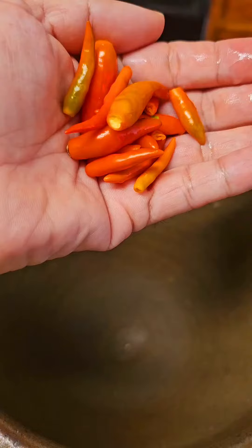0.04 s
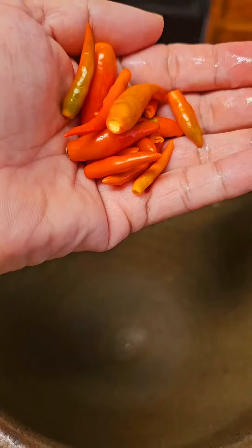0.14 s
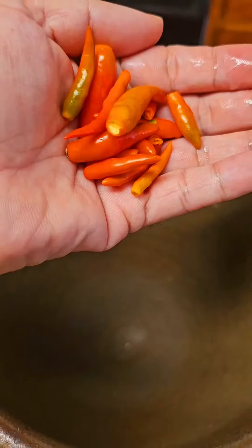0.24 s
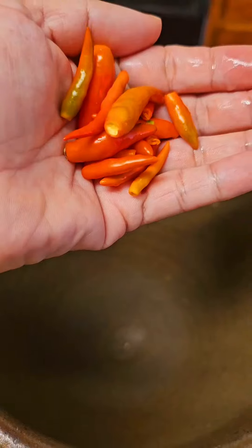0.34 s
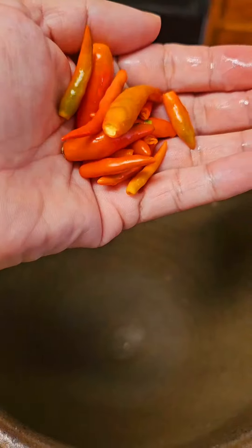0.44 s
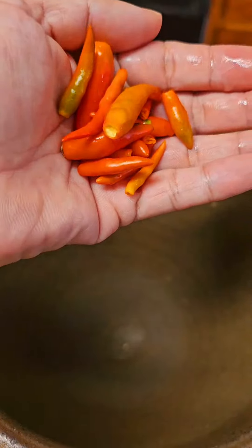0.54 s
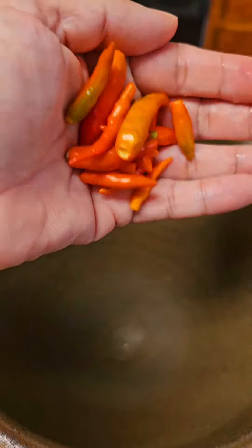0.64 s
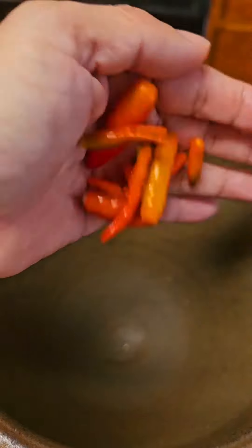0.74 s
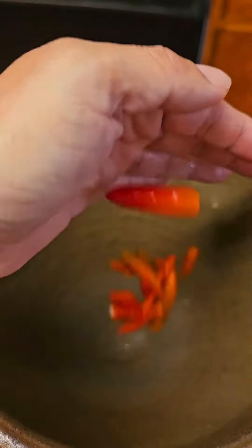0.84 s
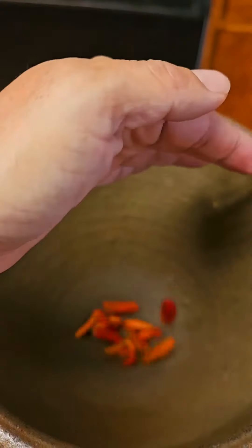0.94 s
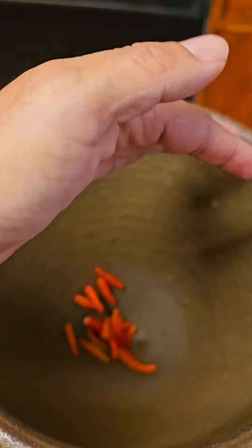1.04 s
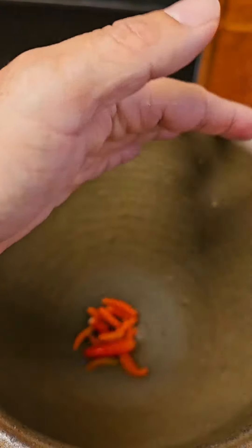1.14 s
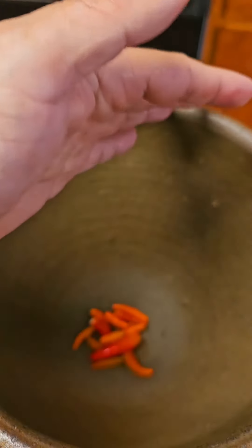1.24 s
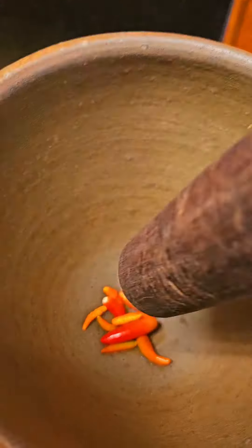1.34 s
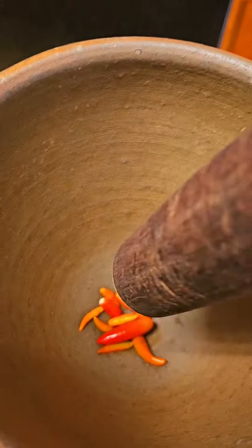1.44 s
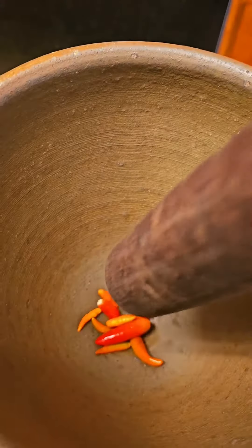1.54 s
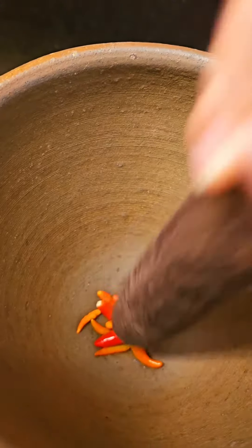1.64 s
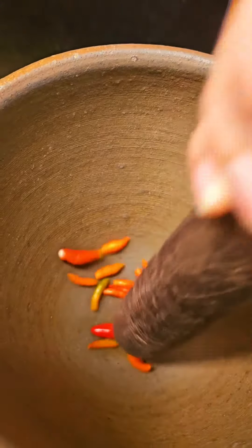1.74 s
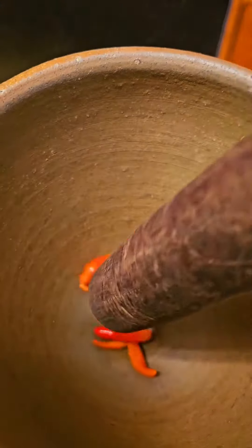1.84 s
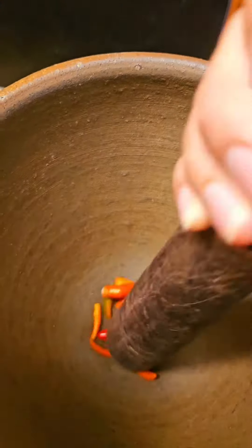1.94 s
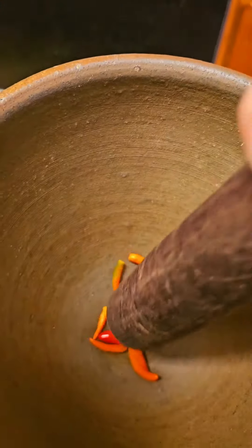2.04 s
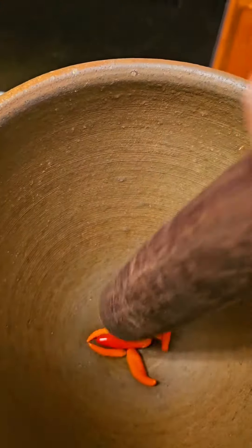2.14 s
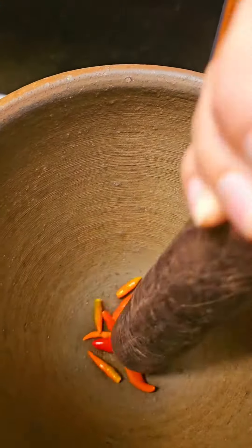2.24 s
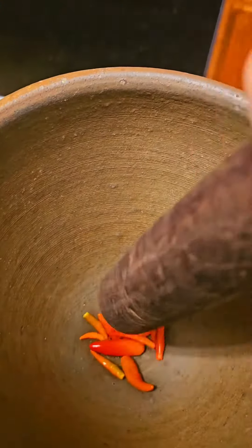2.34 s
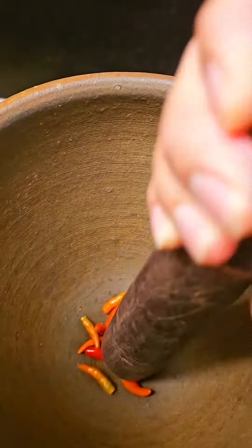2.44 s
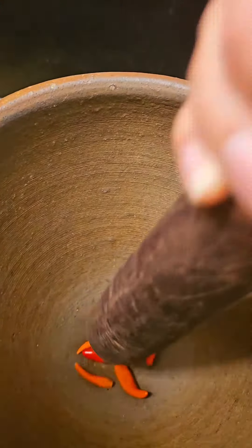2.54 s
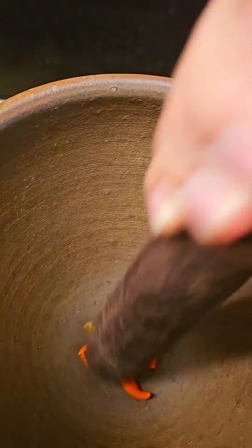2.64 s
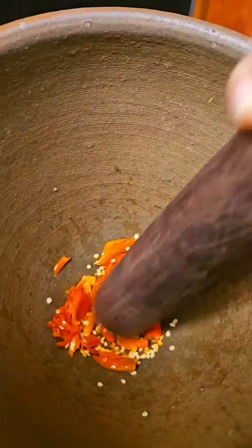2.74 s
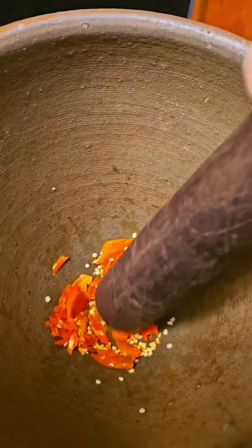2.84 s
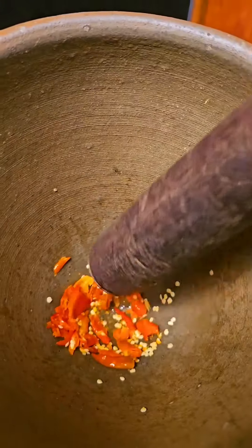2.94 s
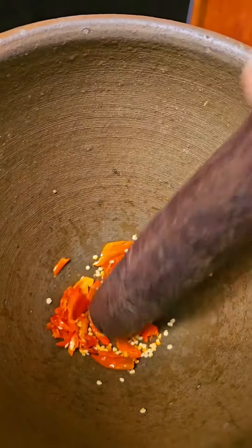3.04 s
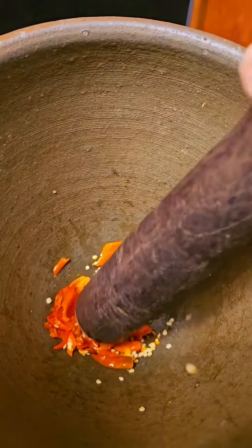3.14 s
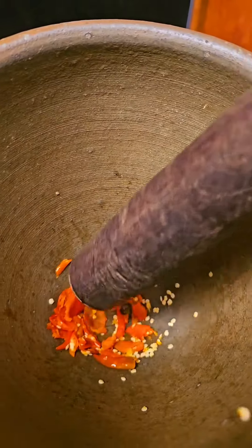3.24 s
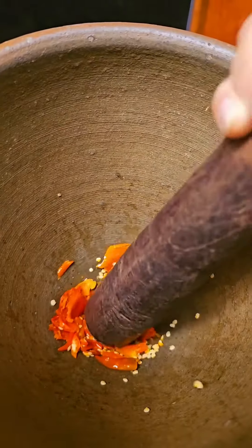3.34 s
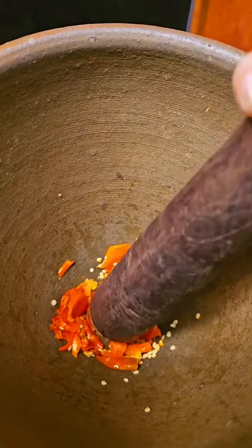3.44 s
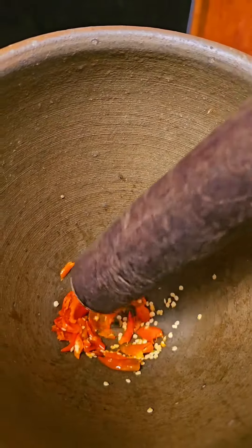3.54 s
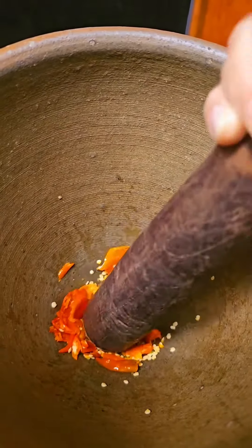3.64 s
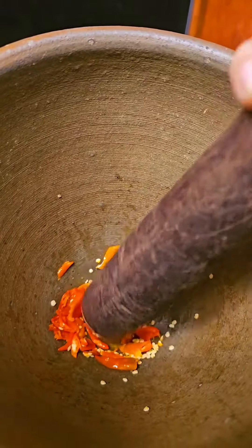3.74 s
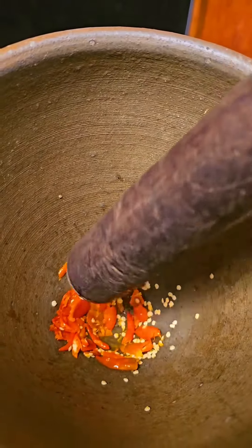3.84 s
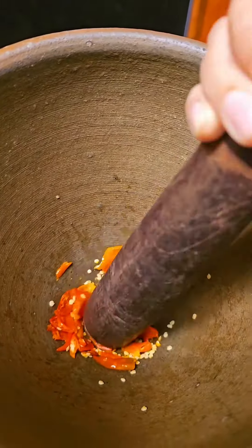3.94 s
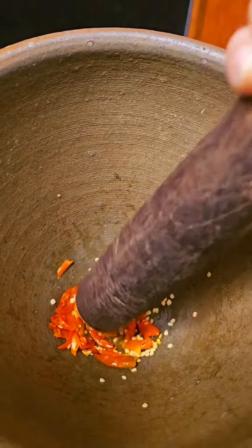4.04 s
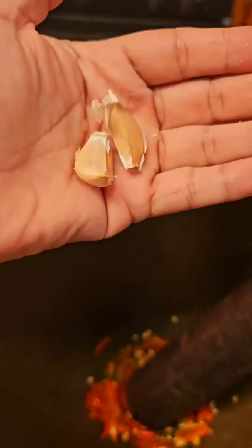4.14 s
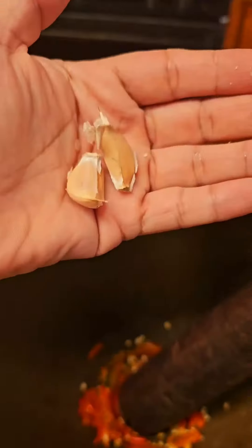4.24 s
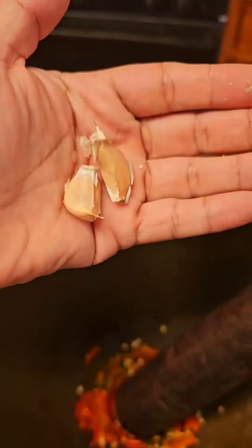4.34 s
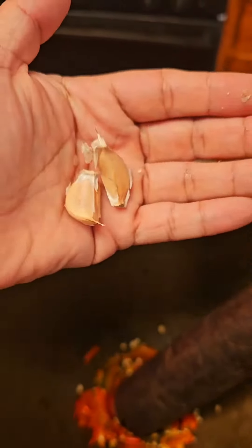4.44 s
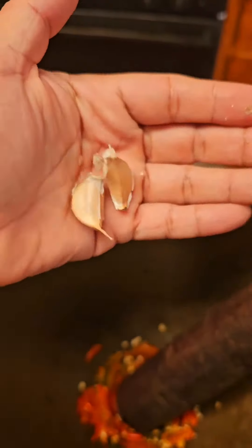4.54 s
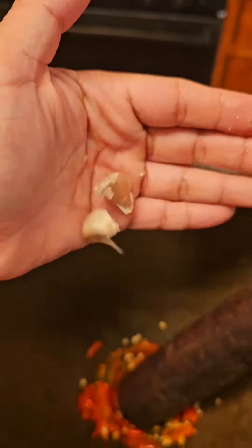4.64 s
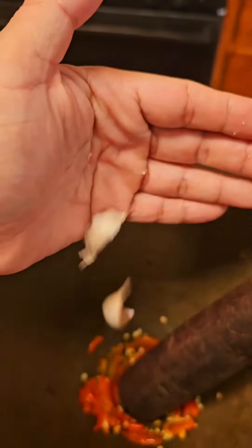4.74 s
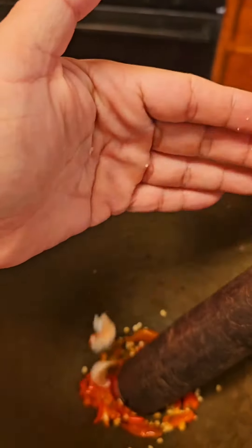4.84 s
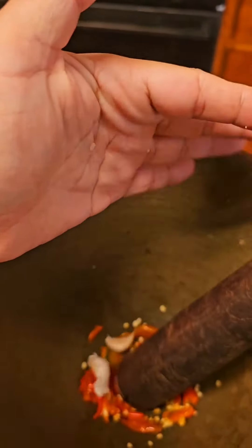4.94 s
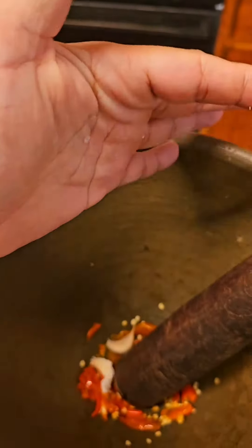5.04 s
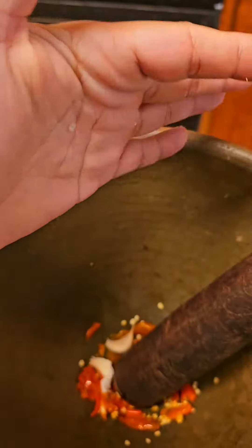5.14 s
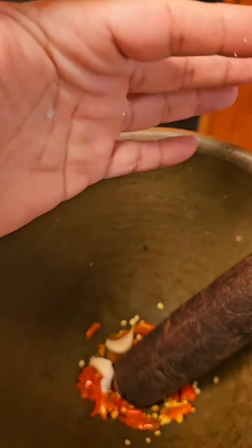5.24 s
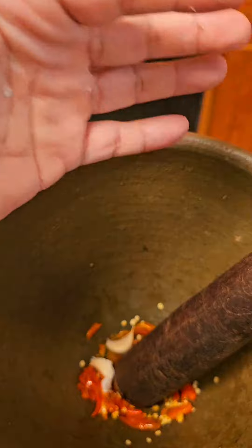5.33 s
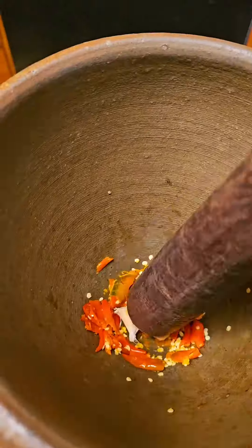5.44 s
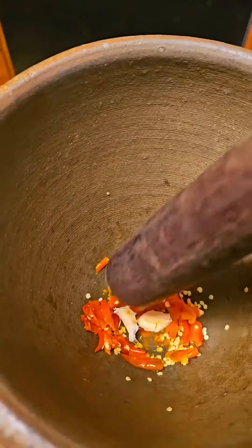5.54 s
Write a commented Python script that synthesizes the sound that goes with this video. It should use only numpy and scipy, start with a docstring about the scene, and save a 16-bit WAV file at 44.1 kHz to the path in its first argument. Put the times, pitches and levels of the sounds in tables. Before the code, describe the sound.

Close kitchen pounding: a soft spill of pods, nine steady hollow pestle blows growing squelchier, a pause, then light garlic ticks on clay.

```python
"""A wooden pestle pounds chillies nine times in a clay mortar, close by in a small kitchen; two garlic cloves follow.
Before the blows the pods patter down. The first blow knocks almost bare clay; pods cushion the next, then thin out.
Bell-shaped pushes ring the mortar's resonances; filtered, grainy noise makes the squelches, slaps and rustles.
Fading noise makes the echo. Behind it all lie a low hum, a thin whine at first and a faint hiss later on."""
import sys
import numpy as np
from scipy import signal
from scipy.fft import rfft, irfft
from scipy.io import wavfile

SR = 44100
rng = np.random.default_rng(int(sys.argv[2]) if len(sys.argv) > 2 else 0)


def to_wav(sig):
    """Store sig (one row per channel, or 1-D mono) as 16-bit WAV at the path in sys.argv[1].

    Samples outside -1..1 are clipped; the rate is SR.
    """
    pcm = np.clip(np.atleast_2d(sig), -1, 1) * 32767
    pcm = np.round(pcm).astype(np.int16)
    wavfile.write(sys.argv[1], SR, pcm.T)  # frames by channels


N = 246078

# pestle blows: (time [s], thud level [dB], contact half-time [ms], clay clink level [dB], squelch level [dB],
# squelch length [s], air pocket [Hz], squelch left-right difference [dB])
PESTLE_BLOWS = [(1.778, -1.5, 0.16, -16.5, -30, 0.0069, 1130, 9),
                (2.035, -16, 1.24, -39.5, -23.5, 0.0041, 8560, 8),
                (2.2975, -6, 0.92, -28.5, -18, 0.0037, 3300, 8),
                (2.5314, -8.5, 1.5, -35.5, -20.5, .004, 3260, 15.5),
                (2.837, -9, 0.61, -45.5, -21.5, 0.0018, 6600, 19.5),
                (3.1446, -5, 0.54, -41.5, -9.5, 0.0014, 7430, 6.5),
                (3.4355, -4.5, 0.53, -27.5, -11, .0018, 4300, 0.5),
                (3.7345, -6, 0.61, -33.5, -8, 0.00093, 5690, -4),
                (4.027, -9, 0.51, -41, -15, .0012, 5200, 6.5)]
# the pestle slips off the pulp and squeezes it again:
# (time [s], squelch level [dB], squelch length [s], air pocket [Hz], left-right difference [dB])
PESTLE_SLIPS = [(2.308, -22, 0.0036, 6560, -11.5), (2.5442, -14.5, 0.0022, 7400, 3.5),
                (2.847, -19, 0.0026, 4650, 1), (3.442, -26.5, 0.0071, 2270, -1),
                (4.044, -25.5, 0.0014, 7990, 14)]
# resonances of the mortar on its board, with the hollow of the bowl:
# (frequency [Hz], level [dB], time to fall by 60 dB [s])
MORTAR_MODES = [(65, -26, 0.24), (94, -7.5, 0.036), (161.5, -20, 0.26), (199, -3, 0.03),
                (276.4, -11, 0.084), (347, 1, 0.032), (447, -12.5, 0.21), (492.7, 7.5, 0.039),
                (747, 1, 0.034), (914, -2, 0.016), (1112, -1.5, 0.024), (1420, -3, .035)]
# resonances of the clay wall, for hard contact: (frequency [Hz], level [dB], time to fall by 60 dB [s])
WALL_MODES = [(1230, -5, .04), (1287, 0, .09), (1840, -18, .05), (2240, -19, .09), (2830, -15, .06),
              (3160, -5, .07)]
# the pounding and its echo are silent between these times [s]
SILENT_FROM_S, SILENT_UNTIL_S = 4.147, 5.356


def pestle():
    """Each blow thuds, clinks on the clay and gurgles, more so on a thick cushion; slips bump softly."""
    # colour of the gurgle: (frequency [Hz], level [dB])
    gurgle_colour = [(60, -21), (150, -10.5), (350, 0), (750, -1.5), (1400, -9.5), (3000, -12.5),
                     (16000, -30)]
    gurgle_db = -27  # relative to the thud, at a contact half-time of 1 ms
    gurgle_rise_s, gurgle_decay_s = .005, .012
    slip_thud_db = -11.5  # relative to the slip's squelch
    out = np.zeros((2, N))
    for s, thud_db, contact_ms, clink_db, *_ in PESTLE_BLOWS:
        lead, thud = knock(MORTAR_MODES, contact_ms)
        # the mortar stands a little to the left
        add(out, s - lead, amp(thud_db) * ports(thud, side_db=1.14, lag_ms=.38))
        lead, clink = knock(WALL_MODES, contact_ms=.17)
        # minus: fills in the clink's sound just below the wall's lowest resonance
        add(out, s - lead, -amp(clink_db) * ports(clink, side_db=6.5, lag_ms=.14))
        lead, gurgle = burst(lambda hz: read(gurgle_colour, hz), gurgle_rise_s, gurgle_decay_s,
                             grain_db=6.5, same=.13)
        add(out, s + gurgle_rise_s - lead, amp(thud_db + gurgle_db) * contact_ms * gurgle)
    lead, bump = knock(MORTAR_MODES, contact_ms=1.2)
    for s, squelch_db, *_ in PESTLE_SLIPS:
        add(out, s - lead, amp(squelch_db + slip_thud_db) * bump)
    return out


def pulp(spread_db=0.5):
    """Pulp squirts just before each blow and at each slip; skins snap. Returns jets and spray."""
    # a taut skin snaps: (time [s], level [dB], air pocket [Hz], left-right difference [dB])
    skin_snaps = [(1.7766, -18.5, 2560, 10), (2.0327, -7, 8230, 0), (2.528, -10.5, 3270, -8.5),
                  (5.477, -32, 9000, -5)]
    squelch_lead = .6  # juice peaks this share of its length before the pestle lands
    pocket_db, snap_pocket_db = 8.5, 13  # height of the air pocket's resonance
    snap_s = .0005
    squirts = []
    for s, _, _, _, db, length, hz, side_db in PESTLE_BLOWS:
        squirts.append(squirt(s - squelch_lead * length, db, length, hz, side_db, pocket_db))
    for slip in PESTLE_SLIPS:
        squirts.append(squirt(*slip, pocket_db))
    for s, db, hz, side_db in skin_snaps:
        squirts.append(squirt(s, db, snap_s, hz, side_db, snap_pocket_db))
    jets, sprays = np.zeros((2, 2, N))
    for start, jet, spray in squirts:
        add(jets, start, jet)
        add(sprays, start, amp(spread_db) * spray)
    return jets, sprays


def squirt(s, db, length, pocket_hz, side_db, pocket_db):
    """Juice and air escape through a pocket: returns start time, aimed jet and spray for the room."""
    # colour of the juice: (frequency [Hz], level [dB])
    juice_colour = [(300, 5.5), (700, -1.5), (1300, -13.5), (1800, -4.5), (3000, -5), (5000, -4),
                    (8000, -1.5), (10500, -10.5), (13000, -2.5), (16000, -10.5)]
    gaps = ripple(3.5, 900, size=56)  # gaps in the pulp colour the jet

    def half_pocket(hz):
        """Half the height of the air pocket's resonance, in dB: spray gets one half, the jet both."""
        octaves_off = np.log2((hz + 1) / pocket_hz)
        return pocket_db / (1 + (octaves_off / .3) ** 2) / 2

    lead, spray = burst(lambda hz: read(juice_colour, hz) + half_pocket(hz), length, length,
                        grain_db=5.5, same=.32)
    jet = shaped(spray, lambda hz: read(gaps, hz) + half_pocket(hz))
    jet *= np.linalg.norm(spray) / np.linalg.norm(jet)  # as strong as the spray
    return s - lead, amp(db) * ports(jet, side_db, lag_ms=.194), amp(db) * spray


def chillies(knock_db=3.5, slap_db=2, count=16):
    """Pods patter into the bowl, each with its own short slap and a light mortar knock, then slide."""
    # the clearest landings: (time [s], level before the slap and knock gains [dB])
    clear_landings = [(1.0366, -43), (1.047, -35.5), (1.063, -37.5), (1.0965, -38.5), (1.112, -36.5),
                      (1.213, -53), (1.231, -47)]
    # colour of a pod's slap: (frequency [Hz], level [dB])
    pod_colour = [(200, -6), (480, 11.5), (800, -13), (1300, 8.5), (2000, -1.5), (5000, -1.5), (7500, -8.5),
                  (10000, -18.5), (16000, -11)]
    # the rest of the handful patters down, ever more softly
    pour_s, pour_length_s = 1.03, .25
    pour_db, fade_db_per_s, scatter_db = -41.5, 72, 2
    out = np.zeros((2, N))
    after = pour_length_s * ((np.arange(count) + rng.random(count)) / count) ** 1.5
    levels = pour_db - fade_db_per_s * after + scatter_db * rng.standard_normal(count)
    tap_lead, tap = knock(MORTAR_MODES, contact_ms=.12)
    for s, db in [*clear_landings, *zip(pour_s + after, levels)]:
        own = ripple(4.5, 400, size=20)
        lead, slap = burst(lambda hz: read(pod_colour, hz) + read(own, hz), rise=.0003, decay=.002,
                           grain_db=3, same=.7)
        add(out, s - lead, amp(db + slap_db) * slap)
        add(out, s - tap_lead, amp(db + knock_db) * tap)
    out *= amp([[2], [-2]])  # louder on the left
    # the pods slide to the bottom of the bowl
    add(out, *rustle(s=1.06, db=-51.5, rise=.02, decay=.095, tilt_db=-4))
    return out


def garlic():
    """Dry skin ticks on the clay and rustles; the firm clove rings the wall of the bowl."""
    # cloves landing and bouncing: (time [s], skin tick level [dB], wall ring level [dB], ring delay [s])
    clove_landings = [(4.8954, -29.5, -39.5, 0.00073), (4.9689, -27, -36, 0.014),
                      (5.028, -44.5, -72, 0.00048), (5.06, -54, -50.5, 0.00105), (5.0939, -49, -51, 0.013)]
    # colour of the skin's tick: (frequency [Hz], level [dB])
    skin_colour = [(500, -29.5), (1500, 3.5), (3000, 1.5), (6000, 5), (9000, 3.5), (13000, 2.5),
                   (16000, 5.5)]
    husk_db, husk_after_s = -17.5, .0047  # the papery husk's rustle, relative to its tick
    out = np.zeros((2, N))
    ring_lead, ring = knock(WALL_MODES, contact_ms=.06)
    for s, tick_db, ring_db, delay in clove_landings:
        lead, skin = burst(lambda hz: read(skin_colour, hz), rise=.0004, decay=.002, grain_db=3, same=.5)
        add(out, s - lead, amp(tick_db) * ports(skin, side_db=8.0, lag_ms=.17))
        add(out, s + delay - ring_lead, amp(ring_db) * ports(ring, side_db=-4.5, lag_ms=.037))
        add(out, *rustle(s + husk_after_s, tick_db + husk_db, rise=.0063, decay=.0082, tilt_db=8))
    return out


def rubbing():
    """Grainy rustles of the hand, the skins and the resting pestle."""
    # single rubs: (time [s], level [dB], decay [s], brightness [dB per octave, well above 1 kHz])
    rubs = [(.443, -61, 0.025, -9), (.499, -62, 0.029, -5.5), (.80, -59, 0.014, -20),
            (1.70, -66.5, 0.31, -5), (1.915, -51.5, 0.19, 0), (4.348, -57.5, 0.029, .5),
            (4.388, -57, 0.056, -6), (4.64, -73, 0.14, 5), (4.816, -49.5, 0.0099, 7),
            (5.445, -40.5, 0.0086, 0), (5.462, -45, 0.039, 0.5)]
    rise_share = .19  # rise time as a share of the decay time
    out = np.zeros((2, N))
    for s, db, decay, tilt_db in rubs:
        add(out, *rustle(s, db, rise_share * decay, decay, tilt_db))
    return out


def rustle(s, db, rise, decay, tilt_db):
    """One rub is a swarm of tiny cracks; returns its start time and its sound."""
    # basic colour of rubbing: (frequency [Hz], level [dB])
    rub_colour = [(400, -3.5), (1300, -8), (3000, -6.5), (6500, -2.5), (9000, -10), (13000, -7.5),
                  (16000, -18.5)]
    lead, grains = burst(lambda hz: read(rub_colour, hz) + tilt_db * np.log2(1 + hz / 1000), rise, decay,
                         grain_db=6.0, same=.092)
    return s - lead, amp(db) * ports(grains, side_db=2.0, lag_ms=.22)


def nudges():
    """The pestle shifts on the pulp and nudges the mortar: long contact makes soft, low bumps."""
    # nudges: (time [s], level [dB])
    pestle_nudges = [(5.453, -30.5), (5.501, -35)]
    out = np.zeros((2, N))
    lead, bump = knock(MORTAR_MODES, contact_ms=3.4)
    for s, db in pestle_nudges:
        add(out, s - lead, amp(db) * bump)
    return out


def tick():
    """One faint, dry tick, a single sample long."""
    out = np.zeros((2, N))
    add(out, 5.356, amp(-39) * np.ones((2, 1)))
    return out


def kitchen(x, room_db=-13, near_db=-10, near_t60=0.086, mono_hz=260, build_s=0.0018):
    """Quick reflections from bowl and worktop, then the room's tail; the bass is alike in both ears."""
    # how long the room rings: (frequency [Hz], time to fall by 60 dB [s])
    room_t60 = [(80, 0.54), (200, 0.44), (500, 0.36), (1500, 0.33), (4000, 0.32), (8000, 0.32),
                (15000, 0.28)]
    # colour of the room's tail: (frequency [Hz], level [dB])
    room_colour = [(60, -9), (110, -9), (160, -3), (240, -2), (380, -3), (490, 2), (900, 1), (2500, 1),
                   (7000, 1), (15000, -2)]
    # fading noise, pitch band by pitch band
    hz, t, z = signal.stft(rng.standard_normal((2, SR * 3 // 4)), SR, nperseg=256)
    apart = (1 / (1 + (mono_hz / (hz + 1)) ** 4))[:, None]
    z[1] = np.sqrt(1 - apart) * z[0] + np.sqrt(apart) * z[1]
    fade_db = read(room_colour, hz)[:, None] - 60 * t / read(room_t60, hz)[:, None]
    tail = signal.istft(z * amp(fade_db), SR, nperseg=256)[1]
    t = np.arange(tail.shape[1]) / SR
    tail *= 1 - np.exp(-(t / build_s) ** 2)
    near = shaped(rng.standard_normal(tail.shape), lambda hz: read([(300, -11.5), (1200, -7)], hz))
    near[1] += shaped(near[0] - near[1], lambda hz: -20 * np.log10(1 + (hz / mono_hz) ** 4))
    near *= amp(-60 * t / near_t60) * (t > .0012)
    echo = amp(room_db) * tail / np.linalg.norm(tail[0]) + amp(near_db) * near / np.linalg.norm(near[0])
    return signal.fftconvolve(x, echo, axes=1)[:, :N]


def hum():
    """Low room noise, plus narrow bands of noise that waver like machines."""
    # colour of the room noise: (frequency [Hz], relative level per Hz [dB])
    hum_colour = [(15, -47.5), (25, -7), (43, -4.5), (64, -5.5), (92, -20.5), (141, -9), (236, -18.5),
                  (309, -10), (384, -19.5), (591, -21), (887, -32), (1520, -35.5), (1790, -38.5),
                  (6210, -54.5), (16000, -71)]
    # humming machine bands: (frequency [Hz], width [Hz], level before the common gain [dB])
    drone_bands = [(57, 16, -53.5), (195, 14, -63.5), (234, 22, -58), (283, 7, -67.5)]
    # left-right likeness: (frequency [Hz], likeness from -1 opposite to 1 equal)
    likeness = [(60, 0.98), (180, 0.93), (550, 0.48), (1650, -0.059), (4970, -0.7), (15000, -0.03)]
    wash_db, common_db = -53, -1.5  # the common gain is for the bands alone
    a, b = rfft(rng.standard_normal((2, N)))
    hz = np.fft.rfftfreq(N, 1 / SR)
    same = np.clip(read(likeness, hz), -1, 1)
    pair = np.array([a, same * a + np.sqrt(1 - same ** 2) * b])
    wash = evened(irfft(pair * amp(read(hum_colour, hz)), N))
    bands = np.zeros(N)
    for centre, width, db in drone_bands:
        narrow = rfft(rng.standard_normal(N)) / (1 + (2 * (hz - centre) / width) ** 2)
        bands += amp(db) * evened(irfft(narrow, N))
    return amp(wash_db) * wash + amp(common_db) * bands


def hiss():
    """Faint, even noise that comes up at 4.15 s, as the pounding falls silent, and then stays."""
    # colour of the hiss: (frequency [Hz], relative level per Hz [dB])
    hiss_colour = [(500, 8.5), (2500, -3.5), (7000, -4.5), (8500, -15), (16000, -10)]
    noise = shaped(rng.standard_normal((2, N)), lambda hz: read(hiss_colour, hz))
    return amp(-74.5) * evened(noise) * (np.arange(N) / SR > SILENT_FROM_S)


def whine():
    """A faint, thin, wavering tone at first: noise through a very narrow band."""
    centre_hz, width_hz, level_db, until_s = 1550, 14, -83, 1.44
    tone = shaped(rng.standard_normal(N),
                  lambda hz: -20 * np.log10(1 + (2 * (hz - centre_hz) / width_hz) ** 2))
    return amp(level_db) * evened(tone) * (np.arange(N) / SR < until_s)


def knock(modes, contact_ms, count=16384):
    """A bell-shaped force rings resonances, duller the longer it lasts; returns lead time and sound."""
    t = np.arange(count) / SR
    lead = .015  # the force peaks this many seconds in
    force = np.exp(-.5 * ((t - lead) * 1000 / contact_ms) ** 2)
    ringing = sum(amp(db - 60 * t / t60) * np.cos(2 * np.pi * hz * t) for hz, db, t60 in modes)
    ring = signal.fftconvolve(force, ringing)[:count]
    return lead, np.array([ring, ring]) / abs(ring).max()


def burst(curve_db, rise, decay, grain_db, same, count=16384):
    """A swarm of tiny cracks swells and dies; returns its lead time and its sound."""
    lead = count // 4 / SR
    t = np.arange(count) / SR - lead
    grain = 16  # samples that share one chance level
    levels = np.repeat(rng.standard_normal(count // grain), grain)
    cracks = rng.standard_normal((3, count)) * amp(grain_db * levels)
    # one noise is common to both ears, the other two belong to one ear each
    pair = shaped(np.sqrt(same) * cracks[0] + np.sqrt(1 - same) * cracks[1:], curve_db)
    swell = np.exp(np.minimum(t / rise, -t / decay))
    return lead, evened(pair * swell) * np.sqrt(np.mean(swell ** 2))


def ports(pair, side_db, lag_ms):
    """Two microphone ports: the left is louder by side_db, the right hears the bowl a little later."""
    count = pair.shape[1]
    late = np.exp(-2j * np.pi * np.fft.rfftfreq(count, 1 / SR) * lag_ms / 1000)
    right = irfft(rfft(pair[1]) * late, count)
    return np.array([pair[0] * amp(side_db / 2), right * amp(-side_db / 2)])


def ripple(depth_db, low_hz, size):
    """A chance spectrum of small peaks and notches, as rows (frequency [Hz], level [dB])."""
    return np.column_stack([np.geomspace(low_hz, SR / 2, size), depth_db * rng.standard_normal(size)])


def shaped(x, curve_db):
    """Filters by a function that gives dB for Hz."""
    count = x.shape[-1]
    return irfft(rfft(x) * amp(curve_db(np.fft.rfftfreq(count, 1 / SR))), count)


def read(points, hz):
    """Reads a table of (frequency [Hz], value) between its rows, on a log-frequency axis."""
    f, value = np.transpose(points)
    return np.interp(np.log(hz + 1), np.log(f + 1), value)


def amp(db):
    """Decibels to gain."""
    return 10 ** (np.asarray(db) / 20)


def evened(x):
    """Scales to an rms (average strength) of one."""
    return x / np.sqrt(np.mean(x ** 2) + 1e-20)


def add(mix, s, sound):
    """Mixes a stereo sound in at time s."""
    part = mix[:, max(round(s * SR), 0):][:, :sound.shape[1]]
    part += sound[:, :part.shape[1]]


def scene():
    """The pounding, with it and its echo silent for a stretch, and the small sounds and the background around
    it."""
    # the level rises from near silence at the start and dips briefly once: (time [s], level [dB])
    level_dips = [(0, -70), (.075, -60), (.088, 0), (1.432, 0), (1.438, -26), (1.464, -26), (1.47, 0)]
    t = np.arange(N) / SR
    thuds = pestle()
    jets, spray = pulp()
    pounding = thuds + jets + kitchen(thuds + spray)
    pounding *= (t < SILENT_FROM_S) | (t > SILENT_UNTIL_S)
    handling = chillies() + garlic() + rubbing() + nudges()
    handling = handling + kitchen(handling, room_db=-8.5, near_db=-5.5)
    background = hum() + hiss() + whine()
    return (pounding + handling + background + tick()) * amp(np.interp(t, *np.transpose(level_dips)))


def record(dry):
    """The microphone sheds the deepest bass, peaks stop at full scale, then the top treble is cut."""
    dry = signal.sosfilt(signal.butter(1, 32, "high", fs=SR, output="sos"), dry)
    treble_cut = signal.firwin(511, 16100, window=("kaiser", 9), fs=SR)  # edge in Hz
    return signal.oaconvolve(np.clip(dry, -1, 1), treble_cut[None], "same")


dry = scene()
out = record(dry)
to_wav(out)
```